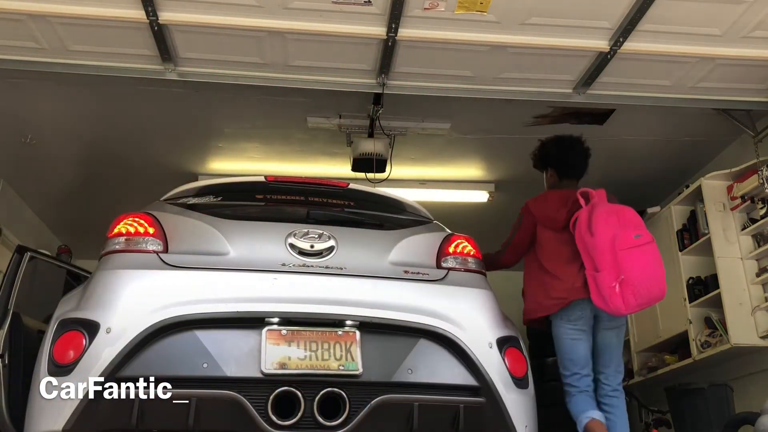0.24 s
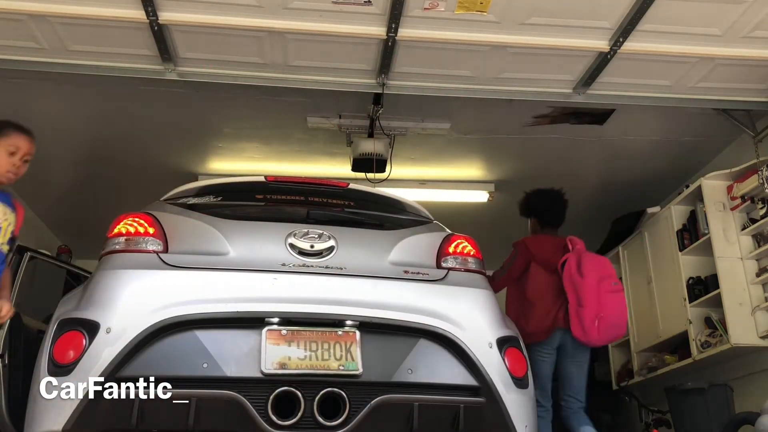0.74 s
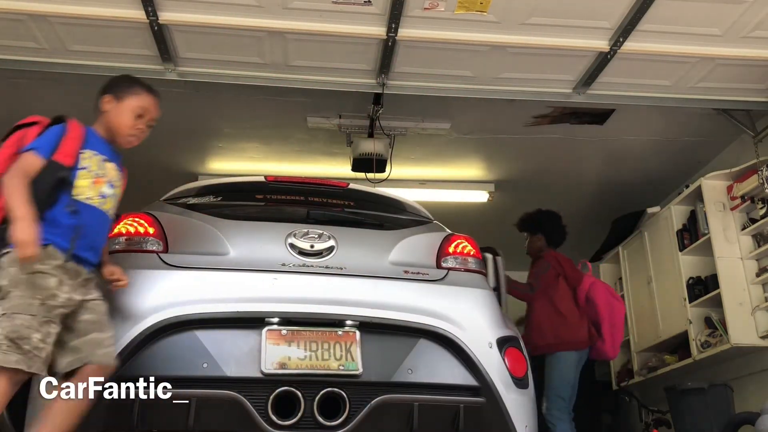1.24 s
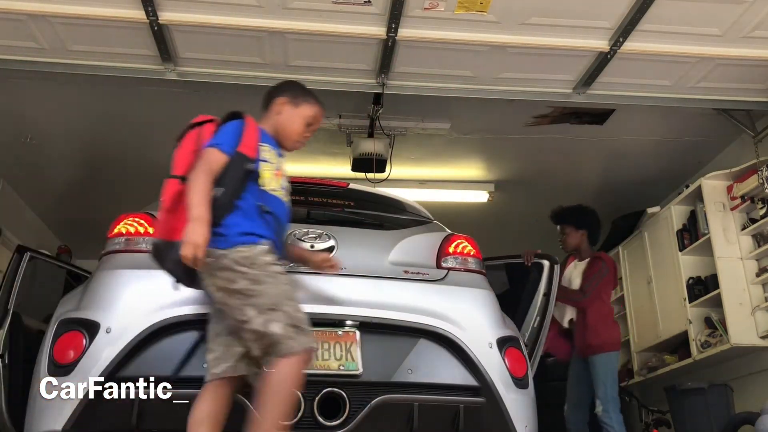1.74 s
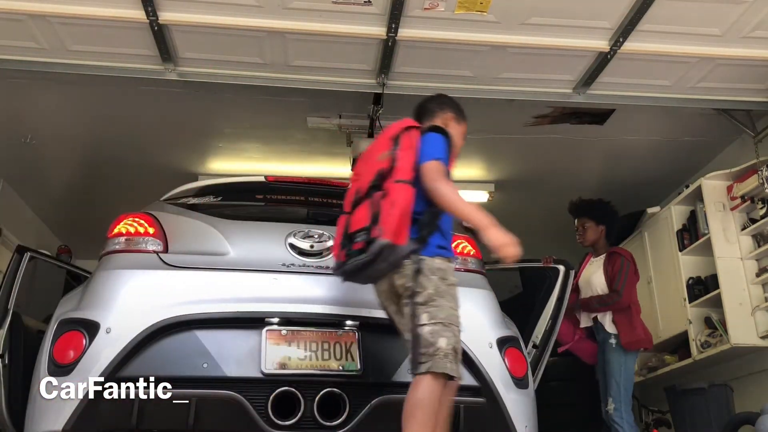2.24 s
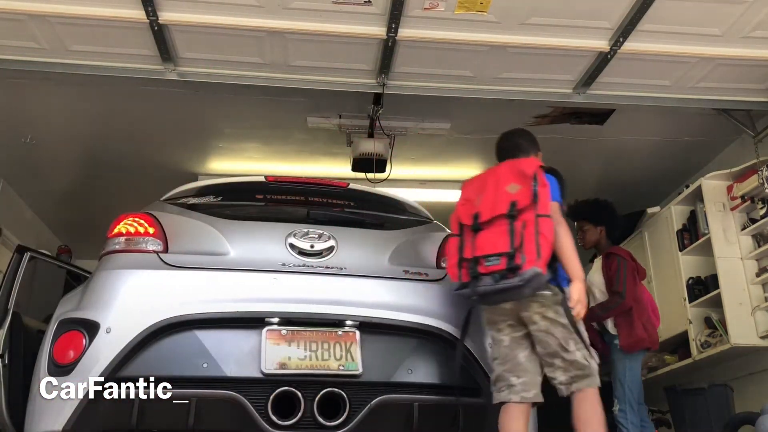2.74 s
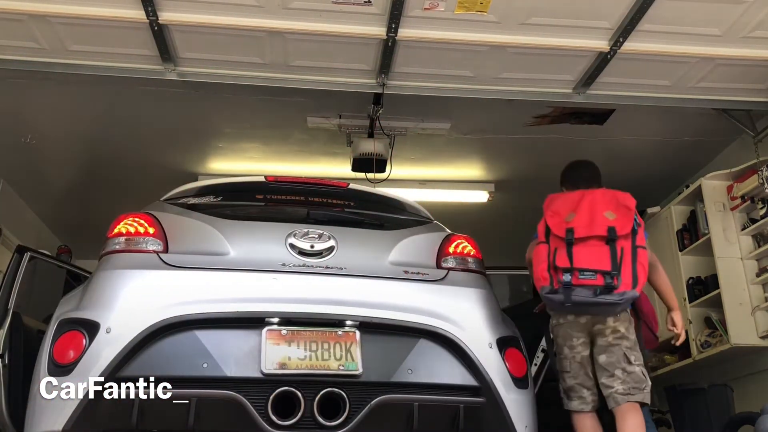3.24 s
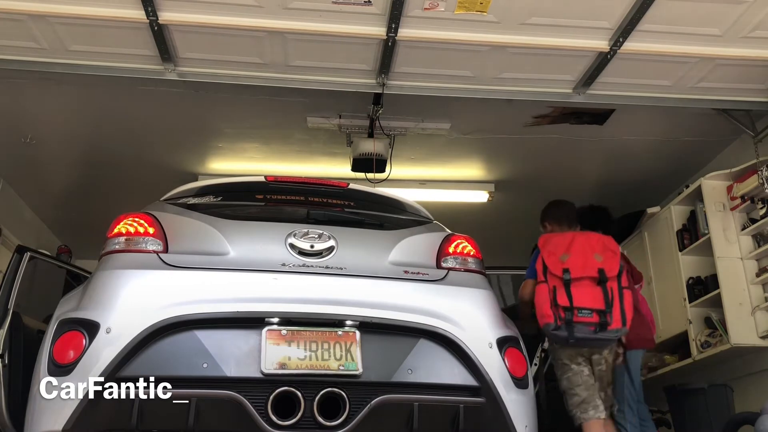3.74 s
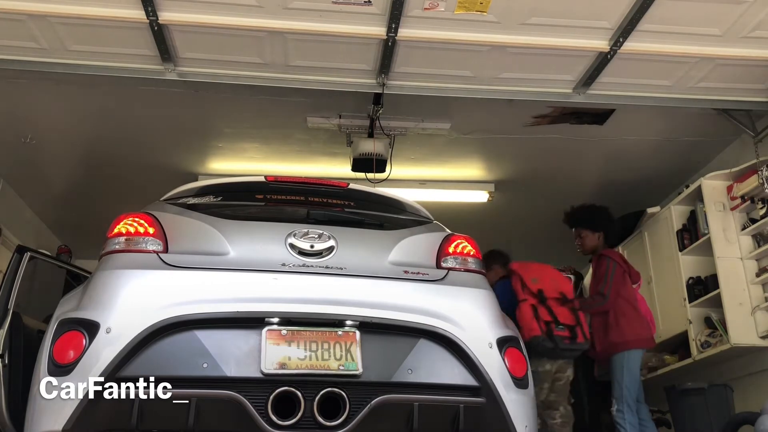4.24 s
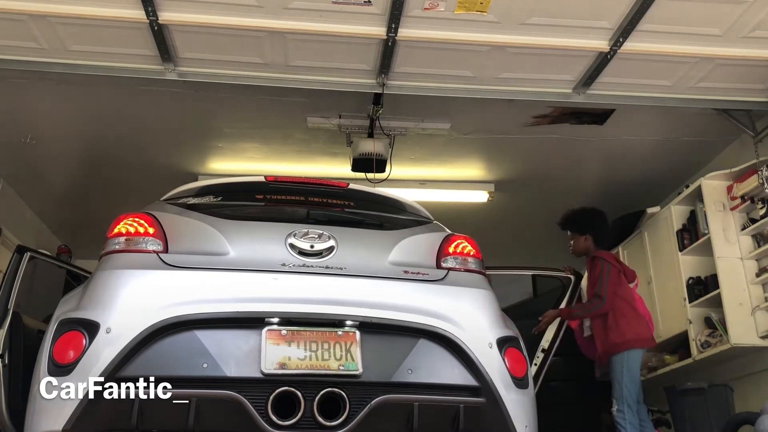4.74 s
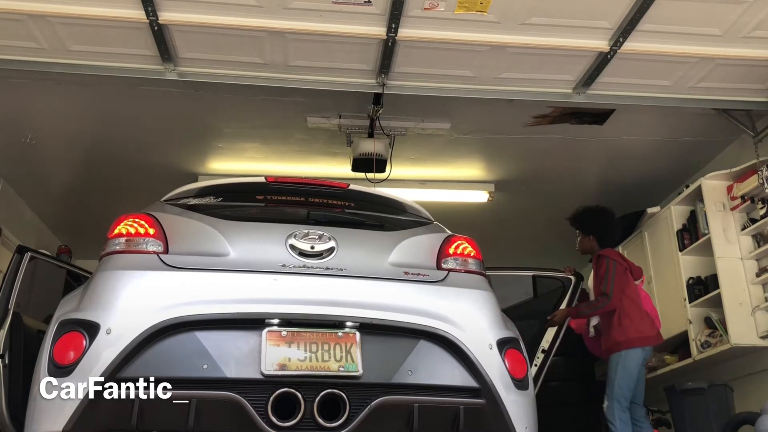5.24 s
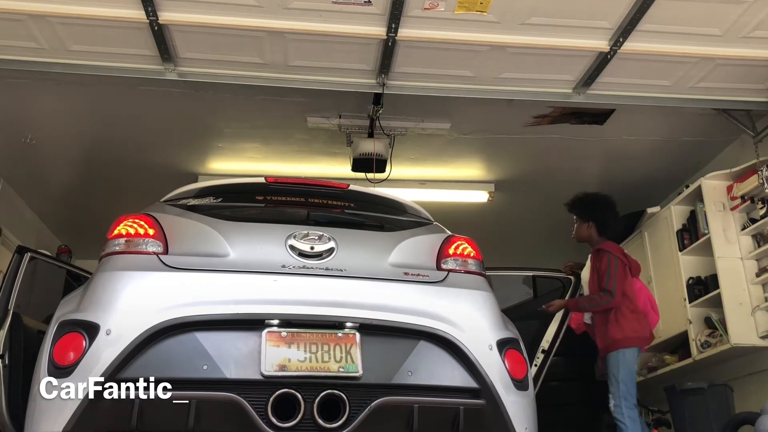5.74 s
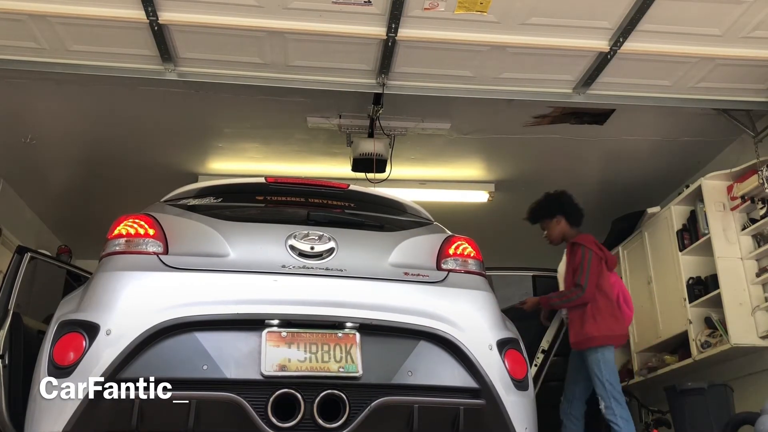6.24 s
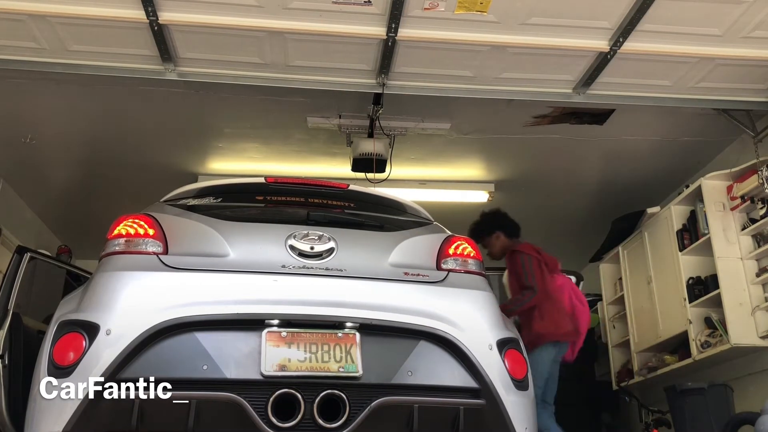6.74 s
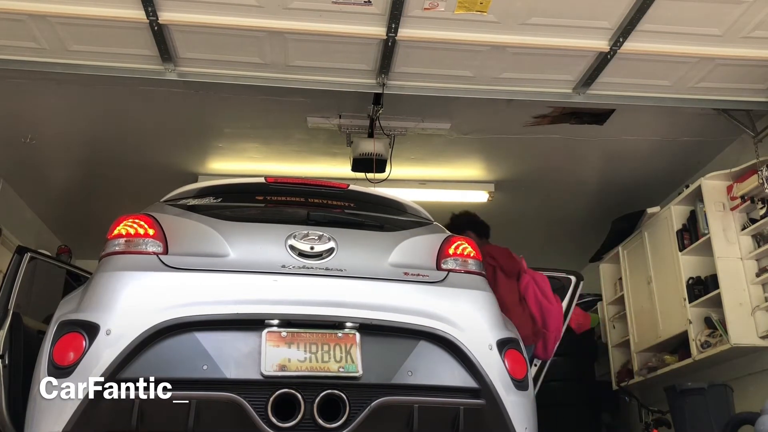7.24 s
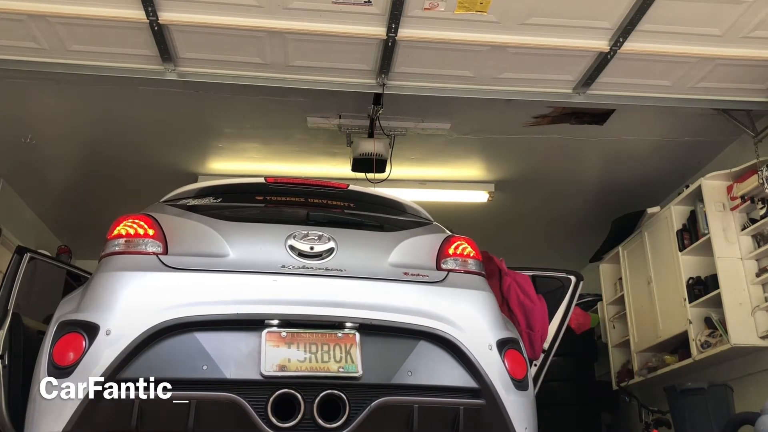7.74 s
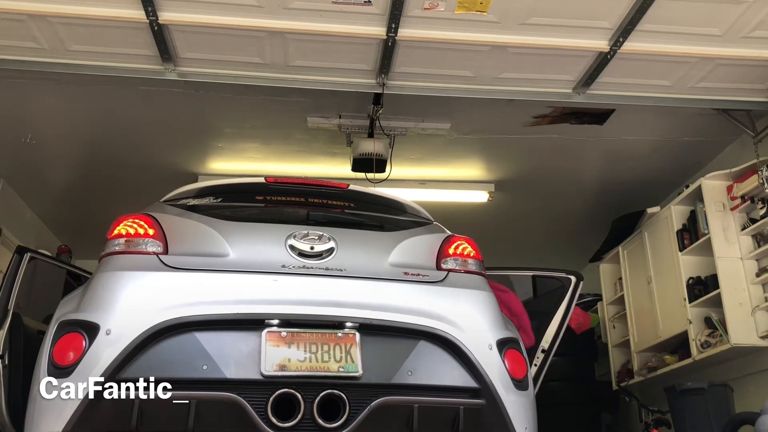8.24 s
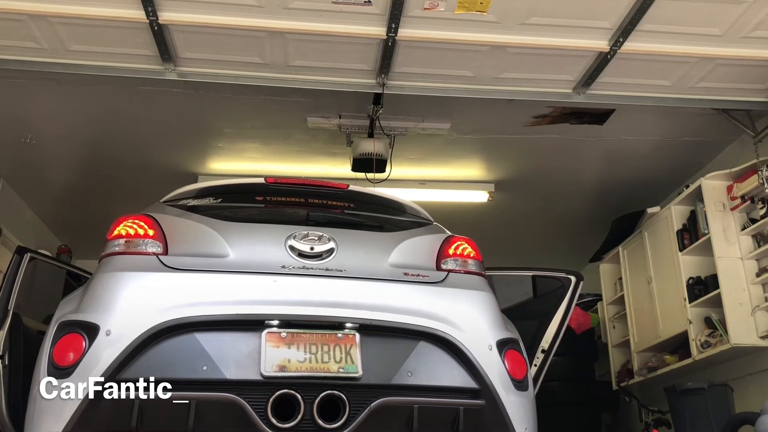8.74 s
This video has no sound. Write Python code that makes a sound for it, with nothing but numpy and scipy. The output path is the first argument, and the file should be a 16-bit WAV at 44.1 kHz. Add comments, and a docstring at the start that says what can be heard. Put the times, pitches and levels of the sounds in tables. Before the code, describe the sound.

A four-cylinder turbo car with an open exhaust idles loudly in a garage, a steady droning burble with raspy gas puffs, heard close behind.

```python
"""An open garage: a four-cylinder turbo car with an open exhaust idles near 1500 rpm, heard close behind it.
Each firing is a click that booms through the pipe, a random blast of bark and a rasping puff of gas.
The idle sags, stumbles three times and recovers; room resonances swell and fade with it.
People walk round: shoes scuff faintly as swells of noise, and bodies shift the resonances.
Steady filtered noise is the hiss of the engine bay."""
import sys
import numpy as np
from scipy import signal
from scipy.fft import rfft, irfft
from scipy.io import wavfile
from scipy.ndimage import uniform_filter1d, minimum_filter1d

SR = 44100
rng = np.random.default_rng(int(sys.argv[2]) if len(sys.argv) > 2 else 0)


def dump_mix(stems):
    """Bounce the given channels to the path in sys.argv[1] as a 16-bit WAV at rate SR."""
    frames = np.atleast_2d(stems).T  # one column per channel
    limited = np.clip(frames, -1, 1)  # hard clip at full scale
    pcm = np.round(limited * 32767).astype(np.int16)
    wavfile.write(sys.argv[1], SR, pcm)


N = 396900
TIME = np.arange(N) / SR  # s
FREQ = np.maximum(np.fft.rfftfreq(N, 1 / SR), 1)  # Hz, kept above zero for the logarithm

# Idle speed, sagging slowly and recovering: (time [s], firing rate [Hz])
IDLE_SPEED = [(0, 50.1), (2.4, 49.79), (3.9, 49.61), (5.2, 49.41), (6.1, 49.65), (7.5, 49.83), (9, 49.87)]
# Brief stumbles of the idle: (time [s], drop in firing rate [Hz])
STUMBLES = [(4.82, 0.62), (5.77, 0.25), (7.98, 0.22)]
STUMBLE_S = .11  # half length of a stumble, s
FIRST_FIRING = .46  # where the first firing falls, in firing periods
# Steady tone of pipe and garage: (multiple of half the firing rate [-], level [dB])
TONE_LINES = [(1, -56.5), (2, -37.5), (3, -21.5), (4, 0.0), (5, -18.0), (6, -10.0), (7, -19.0), (8, -8.0),
              (9, -27.0), (10, -19.0), (11, -24.5), (12, -17.5), (13, -25.5), (14, -9.0), (15, -11.0),
              (16, -15.5), (17, -20.0), (18, -17.5), (19, -22.0), (20, -14.0), (21, -30.5), (22, -22.5),
              (23, -26.5), (24, -15.0), (25, -22.0), (26, -22.5), (27, -22.5), (28, -14.0), (29, -26.5),
              (30, -26.5), (31, -20.0), (32, -33.5), (33, -19.0), (34, -31.0), (35, -19.5), (36, -31.0)]
# Colour of the blast that differs from firing to firing: (frequency [Hz], level [dB])
BARK_COLOUR = [(30, -31), (60, -24), (100, 3), (200, 8), (275, 12), (350, 7.5), (450, 18.5), (550, 8),
               (680, 13), (780, 3), (860, 14.5), (1000, 12), (1400, -35)]
# Resonances the bark rings with: (centre [Hz], width [Hz], boost [dB])
BARK_RINGS = [(348, 22, 8), (442, 22, 4), (497, 22, 8), (598, 22, 8), (695, 24, 10), (770, 20, 6),
              (822, 22, 7), (870, 30, 7)]
# Rush of gas at the tailpipe: (frequency [Hz], level [dB])
GAS_COLOUR = [(400, -28.5), (800, -15.5), (1000, -3), (1300, -1), (1550, -8), (2300, -13.5), (3000, -15),
              (4500, -26.5), (6000, -22.5), (7500, -56), (15000, -68)]
# Ring of the tailpipe: (centre [Hz], width [Hz], boost above the rush [dB])
PIPE_RINGS = [(1088, 23.4, 12), (1128.2, 73, 11), (1290, 40, 2.5), (1397, 37, 5), (1467.6, 159, 14),
              (1628, 30, 13.5), (1917, 158, 12.5), (2172, 54, 13), (2263, 40, 8), (2446, 72, 6.5),
              (2580, 33, 6.5), (2748, 97, 6.5), (3550, 150, 8), (3826, 120, 9), (4046, 160, 9.5)]
# Echoes from the open pipe end and the back wall: (delay [s], share [-], negative = inverted)
ECHOES = [(.0046, -.45), (.0245, .35)]
# Standing waves: (centre [Hz], width [Hz], level at mean speed [dB], change with faster idle [dB/Hz],
# change with stumble drop [dB/Hz], change with a body near [dB])
STANDING_WAVES = [(100, 21, 0, -3, 1, -0.7), (343.4, 18, 0.14, 0, 6, 6), (436, 36, -1, 6, 18, 1.4),
                  (620, 280, 1, 1.2, -1, 1.4), (822, 120, 1.94, 4, -7, -2.2), (1100, 140, 0, 5, .6, 1.5)]
# Someone passes the tailpipes, then the side of the car: (time [s], half length [s], nearness [0-1])
PASSERS = [(2.27, 0.53, 0.8), (6.3, 0.39, 0.32)]
# Shoe scuffs: (time [s], level [dB])
SCUFFS = [(.13, -48), (.29, -49), (.58, -43), (.98, -47), (1.49, -54), (2.41, -47)]
# Hiss of engine bay and turbo: (frequency [Hz], level [dB])
HISS_COLOUR = [(30, 7.5), (1000, 8.5), (3000, -1), (4500, 1), (6000, -5), (7000, -7.5), (9000, -10.5),
               (12000, -14.5), (15500, -15.5)]
# Faint whistles in the hiss: (centre [Hz], width [Hz], boost above the hiss [dB])
WHISTLES = [(8330, 450, 3), (11350, 600, 3), (14220, 400, 4)]
TOP_HZ = 15700  # top of the microphone's range


def boom(times, half_rate_hz, unequal_treble_db=-6, size_db=0.27, edge_db=0.5, waver_db=0.33):
    """Firings drive the pipe; unequal cylinders add lines halfway between the firing harmonics."""
    sizes = undb(size_db * rng.standard_normal(len(times)))
    lines = [(k * half_rate_hz, db) for k, db in TONE_LINES]
    roll_off = [(1000, -36), (1450, -35), (1800, -50), (4000, -85)]  # Hz, dB
    unequal_roll_off = [(hz, db + unequal_treble_db) for hz, db in roll_off]
    alike = colour(clicks(times, sizes), lines[1::2] + roll_off)
    # clicks of alternating sign hold only the in-between lines
    signs = (-1) ** np.arange(len(times))
    unequal = colour(clicks(times, sizes * signs), lines[::2] + unequal_roll_off)
    tone = spread(lag_lows(alike + unequal, lag_s=.0043, corner_hz=700))
    # the burn is now sharper, now softer: the upper lines waver over a firm bass
    edge = irfft(rfft(tone) * bell(610, 510), N)
    edge_gain = undb(edge_db + waver_db * walk(rate=13.0))
    return level(tone + edge * (edge_gain - 1), -10.5)


def bark(times):
    """No two firings burn alike: a short random blast rides on each and rings pipe and room."""
    bursts = puffs(times, np.ones(len(times)), decay_s=0.0092)
    blasts = colour(bursts, BARK_COLOUR, BARK_RINGS)
    return level(lag_lows(blasts, lag_s=.004, corner_hz=700), -26)


def rasp(times, scatter_db=1.3):
    """Gas tears out of the tailpipe after each firing and rings it; the walls scatter it."""
    sizes = undb(scatter_db * rng.standard_normal(len(times)))
    gas = puffs(times, sizes, decay_s=0.0096)
    return level(garage(colour(gas, GAS_COLOUR, PIPE_RINGS)), -25.5)


def scuffs(length_s=0.024):
    """Soles brush the concrete in brief bright swells of noise."""
    swell = swells((s, length_s, undb(db)) for s, db in SCUFFS)
    brush = colour(rng.standard_normal(N), [(1000, -16), (6000, 2), (11000, 0), (15000, -6)])
    return swell * level(brush, 0)


def hiss():
    """Smooth rush of air from the engine bay, heard round the walls."""
    air = colour(rng.standard_normal(N), HISS_COLOUR, WHISTLES)
    return level(garage(air), -36.5)


def standing_waves(x, idle_hz, stumble_hz):
    """Each room resonance follows the engine speed, jumps when the idle stumbles and shifts as a body passes."""
    spectrum = rfft(x)
    faster_hz = idle_hz - idle_hz.mean()
    near = swells(PASSERS)
    for hz, width, rest_db, speed_db, stumble_db, body_db in STANDING_WAVES:
        db = rest_db + speed_db * faster_hz + stumble_db * stumble_hz + body_db * near
        x = x + (undb(db) - 1) * irfft(spectrum * bell(hz, width), N)
    return x


def garage(x):
    """The direct sound, then dense reflections from floor, car and walls."""
    t = TIME[:SR // 2]
    decay = np.exp(-np.log(1000) * t / .25)  # 60 dB down in .25 s
    tail = rng.standard_normal(len(t)) * decay * (t > .003)
    tail = .5 * tail / np.linalg.norm(tail)
    return x + irfft(rfft(x) * rfft(tail, N), N)


def spread(x):
    """Echoes fill the gaps between pulses by turning phase only, so the colour stays the same."""
    spectrum = rfft(x)
    for delay_s, share in ECHOES:
        trip = np.exp(-2j * np.pi * FREQ * delay_s)
        spectrum = spectrum * (1 + share / trip) / (1 + share * trip)
    return irfft(spectrum, N)


def lag_lows(x, lag_s, corner_hz):
    """Low notes build up in the room and arrive late, so each pulse sweeps downward."""
    phase = 2 * np.pi * lag_s * corner_hz * np.arctan(FREQ / corner_hz)
    return irfft(rfft(x) * np.exp(-1j * phase), N)


def clicks(times, sizes):
    """One impulse at each time."""
    places = np.clip(np.round(times * SR).astype(int), 0, N - 1)
    return np.bincount(places, sizes, N)


def puffs(times, sizes, decay_s):
    """Bursts of turbulence that start at once and die away exponentially."""
    pole = np.exp(-1 / (decay_s * SR))
    envelope = signal.lfilter([1], [1, -pole], clicks(times, sizes))
    return envelope * rng.standard_normal(N)


def colour(x, points, peaks=()):
    """Causal (minimum-phase) filter through (Hz, dB) points, with resonances on top."""
    hz, db = np.transpose(points)
    curve_db = np.interp(np.log(FREQ), np.log(hz), db)
    curve_db = curve_db + sum(boost * bell(f, width) for f, width, boost in peaks)
    # folding the cepstrum forward makes the response causal
    cepstrum = irfft(np.log(undb(curve_db)), N)
    cepstrum[1:N // 2] *= 2
    cepstrum[N // 2 + 1:] = 0
    return irfft(rfft(x) * np.exp(rfft(cepstrum)), N)


def bell(hz, width):
    """A resonance hump over frequency: 1 at its centre, one half at the edges of its width."""
    return 2 ** -((2 * (FREQ - hz) / width) ** 2)


def swells(rows):
    """A smooth rise and fall for each (time s, half length s, height)."""
    return sum(height * np.exp(-((TIME - s) / length_s) ** 2) for s, length_s, height in rows)


def walk(rate):
    """Random values, so many a second, joined by straight lines; rms 1."""
    return level(np.interp(TIME * rate, np.arange(SR), rng.standard_normal(SR)), 0)


def undb(db):
    """Decibels to gain."""
    return 10 ** (np.asarray(db) / 20)


def level(x, db):
    """Scale to an rms level."""
    return x * undb(db) / np.sqrt(np.mean(x ** 2))


def scene(jitter_s=.00004):
    """The crank times every firing; all exhaust sounds follow it."""
    idle_hz = np.interp(TIME, *np.transpose(IDLE_SPEED))
    stumble_hz = swells((s, STUMBLE_S, drop_hz) for s, drop_hz in STUMBLES)
    firing_hz = idle_hz - stumble_hz
    # a firing falls each time the running count gains one
    count = np.cumsum(firing_hz) / SR
    times = np.interp(np.arange(FIRST_FIRING, count[-1]), count, TIME)
    times = times + jitter_s * rng.standard_normal(len(times))
    exhaust = boom(times, firing_hz.mean() / 2) + bark(times) + rasp(times)
    exhaust = standing_waves(exhaust, idle_hz, stumble_hz)
    return (exhaust + scuffs() + hiss())[None]


def record(dry):
    """The phone microphone sheds deep rumble, limits the very highest peaks and cuts the top."""
    fade = np.minimum(np.minimum(TIME, TIME[::-1]) / .002, 1)  # 2 ms at each end
    rumble_cut = signal.butter(1, 10, "high", fs=SR, output="sos")
    sound = signal.sosfilt(rumble_cut, dry) * fade
    # the limiter ducks smoothly around any peak above full scale
    gain = 1 / np.maximum(np.abs(sound), 1)
    gain = uniform_filter1d(minimum_filter1d(gain, size=221), size=221)
    top_cut = signal.ellip(16, .1, 80, TOP_HZ, fs=SR, output="sos")
    return signal.sosfilt(top_cut, sound * gain)


dry = scene()
out = record(dry)
dump_mix(out)
```